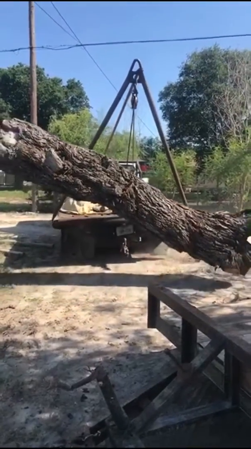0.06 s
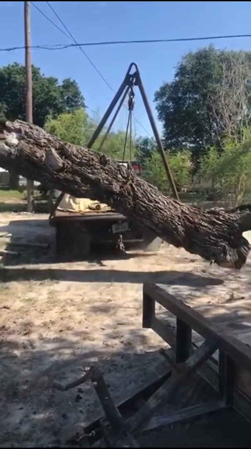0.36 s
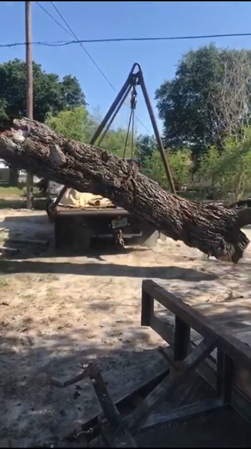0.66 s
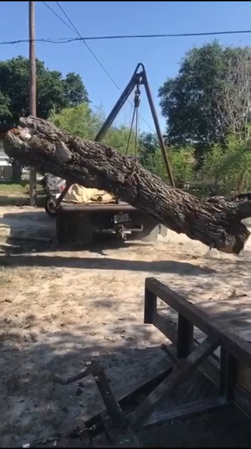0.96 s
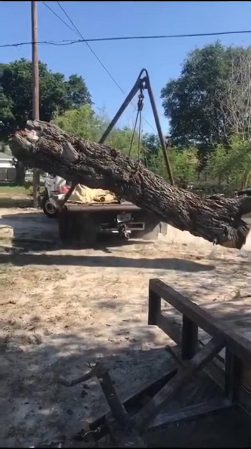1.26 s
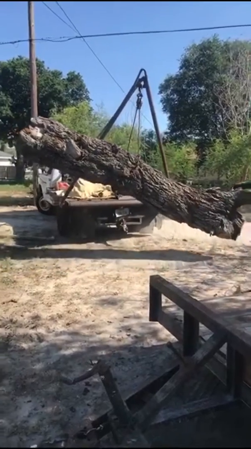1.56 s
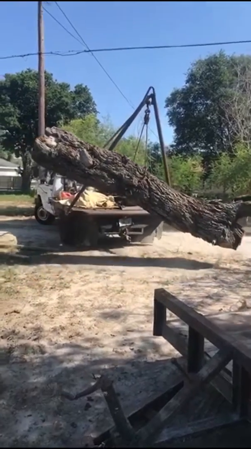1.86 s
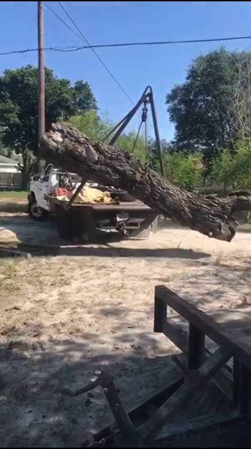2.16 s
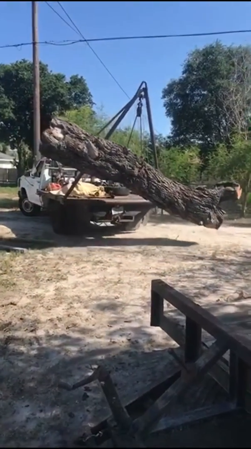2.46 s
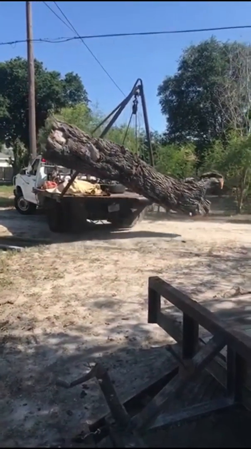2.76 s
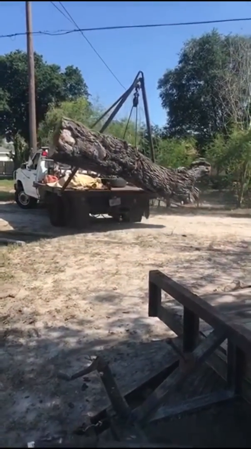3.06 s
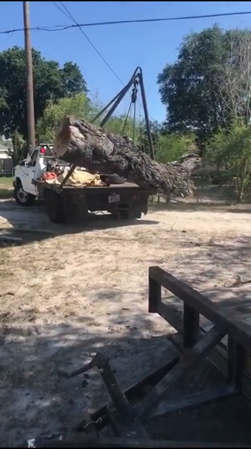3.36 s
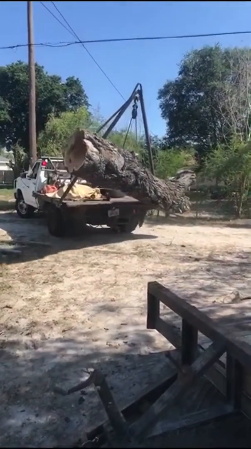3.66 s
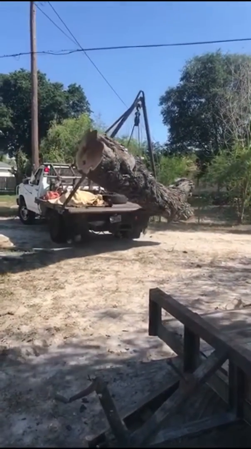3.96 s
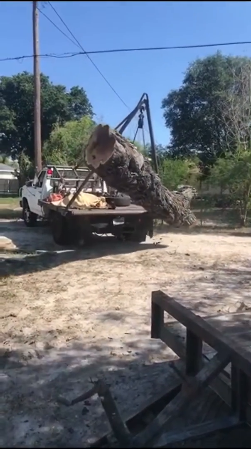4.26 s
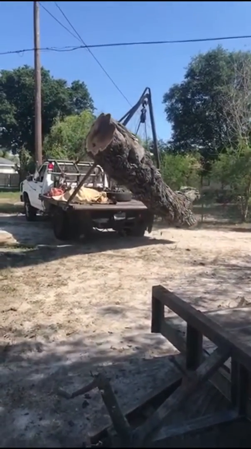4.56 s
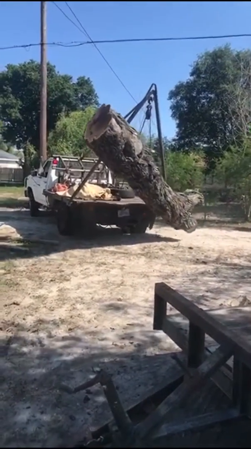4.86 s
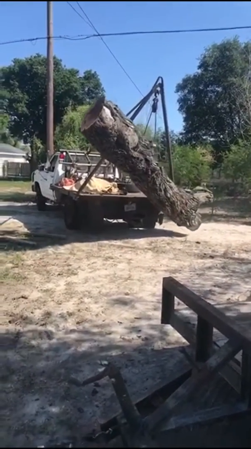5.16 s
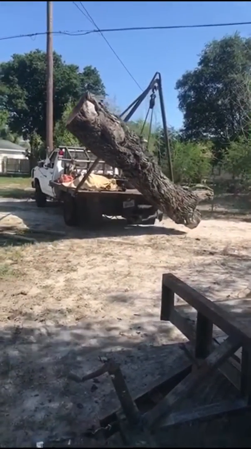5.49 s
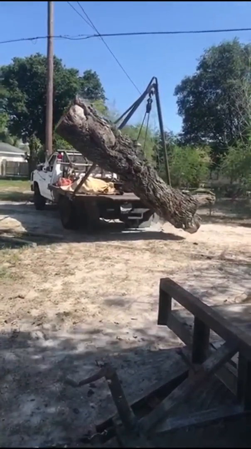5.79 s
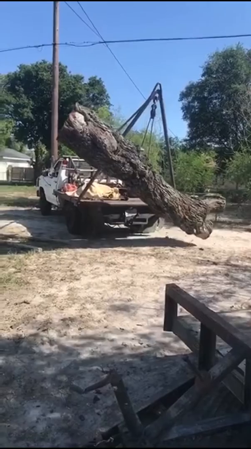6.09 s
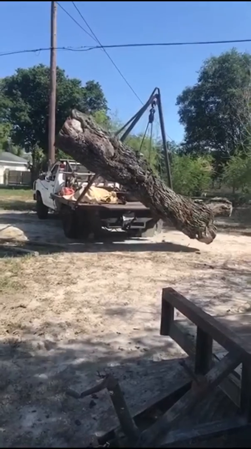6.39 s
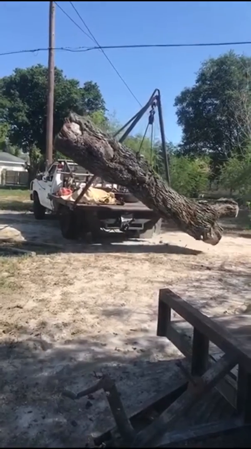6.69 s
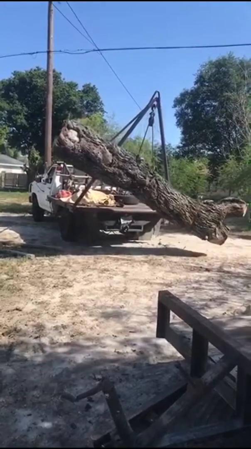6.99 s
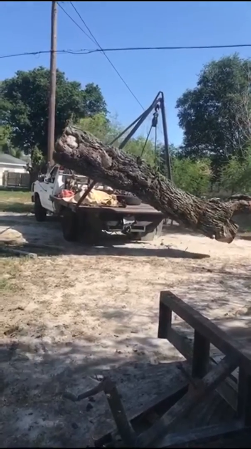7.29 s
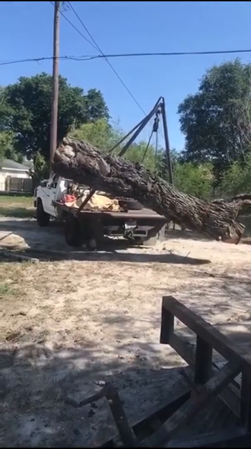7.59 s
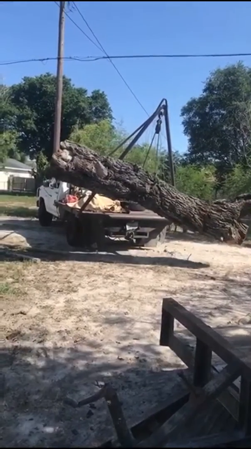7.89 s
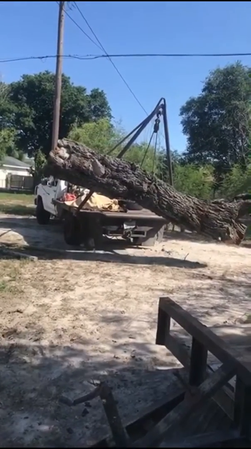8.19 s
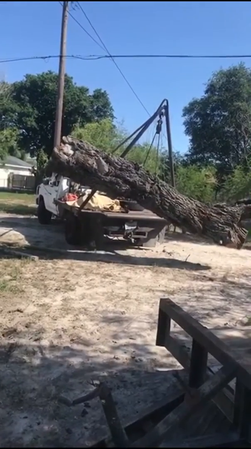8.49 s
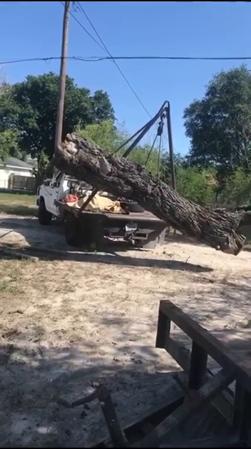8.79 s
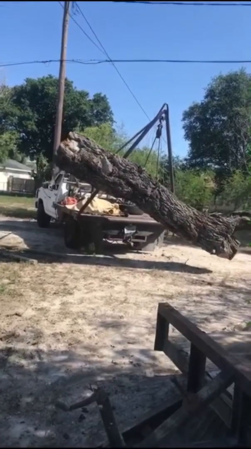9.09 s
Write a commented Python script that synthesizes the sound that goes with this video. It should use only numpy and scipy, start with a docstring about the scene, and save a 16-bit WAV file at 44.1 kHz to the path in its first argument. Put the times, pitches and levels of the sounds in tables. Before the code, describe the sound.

A truck engine rumbles at a crawl while steel scrapes, bangs and chains clink under a heavy log, with wind on the microphone.

```python
"""A dirt lot: a second engine idles close to the microphone as an old V8 flatbed truck crawls away,
a heavy log swinging from its hoist. First a turning steel part scrapes in strokes and squeals while
the V8 slows almost to a stall. At 3 s the rig bangs; the chain clinks and the load rubs on at a crawl,
among small dry ticks. Near 8 s the engine sags again and a faint rustle follows. Gusts buffet the
microphone throughout, hardest near the end."""
import sys
import numpy as np
from scipy import signal
from scipy.fft import rfft, irfft, next_fast_len
from scipy.io import wavfile
from scipy.ndimage import uniform_filter1d, map_coordinates

SR = 44100
rng = np.random.default_rng(int(sys.argv[2]) if len(sys.argv) > 2 else 0)


def master(y):
    """Save y as 16-bit WAV."""
    cut = np.clip(np.atleast_2d(y).T, -1, 1)
    pcm = np.round(cut * 32767)  # scale
    wavfile.write(sys.argv[1], SR, pcm.astype(np.int16))


N = 412026

# Echo of the lot: freq_hz, t60_s
YARD_DECAY = [(200, 1), (2000, 0.67), (6000, 1), (14000, 0.32)]
# The breeze freshens, lulls and returns: time_s, level_db
BREEZE = [(0, -20), (2.1, -19.5), (2.8, -20.5), (4, -34.5), (5, -33.5), (5.4, -28.5), (8.4, -22.5),
          (9.34, -32)]
# Hard buffets on the microphone: start_s, length_s, relative_db
WIND_BUFFETS = [(0.909, 0.11, -23), (1.06, 0.028, -19), (1.892, 0.016, -16), (2.069, 0.066, -17),
                (2.156, 0.14, -17), (2.723, 0.075, -23), (3.545, 0.202, -25), (5.17, 0.06, -34),
                (6.92, 0.15, -33), (7.656, 0.12, -27.5), (8.347, 0.098, -26), (8.887, 0.084, -21.5),
                (9.014, 0.053, -11), (9.061, 0.017, -8), (9.082, .008, -3.5), (9.107, 0.041, -15.5),
                (9.139, 0.025, -11), (9.197, 0.0098, -15.5)]
# Spectra of the breeze, a buffet and its ragged top: freq_hz, density_db
BREEZE_SPECTRUM = [(5, -85), (15, -34), (26, -6), (38, -0.5), (60, 0), (100, -7.5), (160, -23),
                   (300, -34.5), (700, -78)]
BUFFET_SPECTRUM = [(5, -70), (22, 2), (45, 3), (100, -2), (200, -9.5), (400, -21.5), (800, -41.5),
                   (2000, -86)]
FLUTTER_SPECTRUM = [(100, -21), (300, 2), (500, 3), (900, -3), (1400, -15.5), (2000, -25.5), (2800, -45),
                    (5000, -61)]
# The near engine's whirr, injectors and belt: freq_hz, density_db
WHIRR_SPECTRUM = [(240, -34), (400, -18), (520, -20), (650, 2.5), (800, -3), (1080, -1), (1350, -9),
                  (1700, -6), (2100, -16.5), (2400, -11), (3000, -18.5), (5500, -20), (7350, -17.5),
                  (9500, -21), (11500, -30.5), (15000, -53)]
INJECTOR_SPECTRUM = [(3000, -41), (6000, -19), (6700, 6), (7700, -5), (8500, 2), (9700, -10.5),
                     (10600, -32), (13000, -18), (15000, -44)]
BELT_SPECTRUM = [(1400, -55), (1620, -1), (1680, -0.5), (1750, -18), (2000, -55)]
# Its belt whine comes and goes: start_s, length_s, level_db
BELT_SWELLS = [(5.948, 0.41, -59.5), (7.05, .2, -57)]
# Close ticks: start_s, treble_db, body_re_treble_db
DRY_TICKS = [(4.128, -40, -14), (4.168, -37, -14), (4.475, -39, -20), (5.356, -35, -8), (5.463, -36, -12),
             (5.732, -34, -16), (5.83, -38, -20), (5.88, -38, -20), (5.947, -35, -16), (6.89, -39, -20),
             (7.905, -27, 9)]
# Their two bands: freq_hz, density_db
TICK_TREBLE = [(800, -30), (2500, -2), (5000, 0), (10000, -6), (15000, -13)]
TICK_BODY = [(200, 6.5), (1500, 2.0), (4000, -20), (9000, -40)]
# The rustle's hiss: freq_hz, density_db
RUSTLE_SPECTRUM = [(1500, -9), (3000, -1), (6500, -2.5), (10000, -19), (13000, -16), (15000, -30)]
# Its resonances: pitch_hz, width_hz, gain_db
RUSTLE_RESONANCES = [(2530, 39, 12), (3400, 93, 2), (4250, 70, 10), (5100, 62, 1), (6100, 54, -9),
                     (6740, 52, 7)]
# The swinging load leans on the steel: start_s, length_s, relative_db
LOAD_SWINGS = [(2.58, .08, -47.5), (3.08, .12, -44.5), (3.553, .06, -42), (3.775, 0.093, -48.5),
               (4.091, 0.12, -45), (4.234, .14, -40), (4.7, .06, -49.5), (5.449, 0.06, -40.5),
               (5.6, 0.31, -47.5), (6.703, 0.057, -45), (6.853, .04, -49)]
# A rub and its gritty edge: freq_hz, density_db
RUB_SPECTRUM = [(400, -15.5), (700, 1.5), (950, 2), (1500, 0.5), (2000, -1), (2600, 2.5), (3100, -0.5),
                (3700, -2.5), (5000, -6.5), (8000, -9.5), (14000, -32)]
EDGE_SPECTRUM = [(1200, -30), (2300, -2.5), (3000, 2.5), (3700, -4), (4800, -3), (6500, -13.5),
                 (10000, -28), (15000, -45)]
# Chain links snap taut: start_s, relative_db
CHAIN_SNAPS = [(2.183, -37), (2.211, -33), (3.344, -26.5), (3.352, -27), (3.361, -26.5), (3.859, -35.5),
               (3.921, -35), (4.683, -38), (5.108, -50), (5.208, -45), (5.79, -37), (5.85, -47),
               (6.871, -45), (6.921, -38.5), (7.658, -43), (7.677, -38), (7.69, -40.5)]
# A link's ring: pitch_hz, relative_db, t60_s
LINK_MODES = [(804, -3.5, 0.16), (1420, -12.5, 0.23), (2240, -13, 0.071), (2340, 8, 0.056),
              (2510, -2, 0.14), (5351, -27, 0.11), (5620, -11.5, 0.15), (6837, -36, .1), (9330, -21, 0.34),
              (9600, -17, 0.14), (12800, -25, 0.11)]
# A link's crack: freq_hz, density_db
CRACK_SPECTRUM = [(400, -12.5), (700, 4.5), (950, 0), (1500, 0), (2000, 0), (2600, 3.5), (3500, -6),
                  (5000, -7.5), (8000, -16.5), (14000, -41)]
# Blows on the steel bed: start_s, relative_db, t60_s
BED_BLOWS = [(2.862, -34, 0.048), (2.977, -28.5, 0.34), (2.997, -28, 0.23), (3.034, -10.5, 0.19),
             (3.047, -12, 0.13), (3.06, -16, 0.078), (3.078, -20, 0.16), (3.544, -26.5, 0.039),
             (3.655, -32, .25), (3.681, -35.5, 0.18), (3.857, -38.5, 0.14), (3.922, -45, 0.024),
             (4.683, -37, 0.041), (4.745, -39.5, 0.091), (7.67, -42, 0.088)]
# The bed's clatter and the frame's thud: freq_hz, density_db
CLATTER_SPECTRUM = [(40, -42), (130, 4), (320, -2.5), (470, -26), (610, -6), (800, -6.5), (960, -6),
                    (1300, -9.5), (2200, -11), (2900, -15.5), (4500, -25), (8400, -38.5), (14000, -60)]
THUD_SPECTRUM = [(60, -30), (130, -3), (190, 0.5), (310, -3), (450, -17), (900, -63)]
# Ring of the bed, and of the steel scraped hard or grazed: pitch_hz, width_hz, gain_db
BED_RESONANCES = [(310, 30, 2), (829, 42, 7), (958, 30, 7), (1610, 110, 2), (1900, 150, 2), (2570, 50, 4),
                  (2740, 40, 3), (3100, 150, 2)]
HARD_RESONANCES = [(786, 11, -28), (969, 30.6, 15), (1450, 32, 10), (1540, 24, 0), (1743, 12.5, 17),
                   (2365, 28, 8.5), (2705, 22.5, 10), (3043, 48, 6), (3380, 61, 0), (4376, 107, 4),
                   (6530, 160, 0.5), (8650, 210, 0), (9700, 67, -12), (11020, 150, 0)]
GRAZED_RESONANCES = [(659, 18.5, 11), (901, 43, 12.5), (1043, 33, 10.5), (1343, 38, 7), (1780, 52, 8),
                     (2270, 120, 4.5), (2750, 24, 6), (2910, 19, 1.5), (3036, 8.3, 4), (4300, 84, -8)]
# The steel catches: start_s, length_s, pitch_hz, glide_hz_per_s, relative_db
STEEL_SQUEALS = [(.527, .028, 1485, -700, -25), (1.035, .025, 1445, -300, -33), (1.5, .04, 1465, -800, -28)]
# A squeal's partials: pitch_multiple, relative_db
SQUEAL_HARMONICS = [(1, 2.5), (2, -2), (3, -2), (6, -15)]
# Strokes of the turning part: start_s, length_s, level_db
SCRAPE_STROKES = [(0.018, 0.077, -24.5), (0.194, 0.063, -24), (0.35, 0.059, -23), (0.479, 0.093, -26),
                  (0.688, 0.046, -25.5), (0.827, 0.088, -24.5), (.992, 0.069, -24), (1.162, 0.056, -23.5),
                  (1.298, 0.094, -24.5), (1.429, 0.09, -27), (1.536, 0.2, -27.5), (1.806, 0.097, -25.5),
                  (1.938, .12, -27), (2.202, 0.03, -31), (2.354, 0.075, -27), (2.496, 0.092, -26)]
# Their friction: freq_hz, density_db
SCRAPE_SPECTRUM = [(300, -5), (520, -15.5), (750, -4), (1200, -5.5), (1650, -2.5), (2000, -8.5), (2600, -4),
                   (4600, -8), (6600, -13.5), (7600, -18), (11400, -20), (15300, -31.5)]
# The V8 slows, almost stalls, recovers to a crawl and sags once more: time_s, firing_hz
V8_SPEED = [(0, 105), (.6, 96), (1.2, 92.5), (1.8, 76), (2.3, 50), (2.55, 43), (3.2, 57), (3.75, 59.4),
            (5.6, 56.7), (6.2, 58.6), (7.65, 54.5), (8.35, 38), (8.8, 58)]
# Side tones of unequal cylinders, and firing harmonics: firing_multiple, relative_db
LOPE_TONES = [(.625, -11), (.75, -14), (.875, -16), (1.125, -19), (1.25, -22), (1.375, -10), (1.5, -18),
              (1.625, -15), (1.75, -25), (1.875, -25), (2, -16), (2.125, -19), (2.375, -22), (2.625, -24),
              (3, -16)]
# The tailpipe booms near one pitch; tones swell as they pass through it: freq_hz, level_db
PIPE_BOOM = [(25, -31), (40, -29), (58, -23), (84, -15), (106, -20), (130, -21), (180, -24), (300, -37)]
# The tailpipe's colouring of the gas puffs: freq_hz, gain_db
PIPE_RESPONSE = [(10, -79), (60, -12), (110, 1), (175, -0.5), (210, -3.5), (250, -3), (315, -6),
                 (370, -18.5), (480, -25.5), (800, -34.5), (2000, -79)]
# The puffs are strong pulling away, weak at a crawl: time_s, level_db
BURBLE_LEVEL = [(0, -29), (2.4, -25.5), (2.9, -35.5), (7.7, -34), (8.1, -38.5), (9.34, -36.5)]


def amp(db):
    """Decibels to gain."""
    return np.exp(np.asarray(db) * (np.log(10) / 20))


def unit(x):
    """Scale to rms 1."""
    return x / np.sqrt(np.mean(x ** 2) + 1e-20)


def clock():
    """Every sample's time in seconds."""
    return np.arange(N) / SR


def along(points, hz):
    """Read (freq_hz, value) points on a log frequency axis."""
    freqs, values = np.transpose(points)
    return np.interp(np.log(hz + 1), np.log(freqs + 1), values)


def curve(points):
    """Read (time_s, value) points at every sample."""
    return np.interp(clock(), *np.transpose(points))


def wobble(rate):
    """A smooth random curve, rate knots a second."""
    fine = signal.resample_poly(rng.standard_normal(int(N * rate / SR) + 4), 8, 1)
    return np.interp(np.linspace(0, len(fine) - 16, N), np.arange(len(fine)), fine)


def filtered(x, response):
    """Filter x by a gain given as a function of frequency."""
    size = next_fast_len(N + SR // 2)
    return irfft(rfft(x, size) * response(np.fft.rfftfreq(size, 1 / SR)), size)[:N]


def hiss(spectrum, rough_db=0):
    """Coloured noise of rms 1; roughness clumps it into grains."""
    grains = rng.standard_normal(N) * amp(rough_db * wobble(900))
    return unit(filtered(grains, lambda hz: amp(along(spectrum, hz))))


def resonate(x, modes):
    """Add ringing modes to x at unchanged power."""
    def body(f):
        return 1 + sum(amp(db) * 1j * f * width / (hz * hz - f * f + 1j * f * width)
                       for hz, width, db in modes)
    return unit(filtered(x, body)) * np.std(x)


def swell(start_s, length_s, attack_s, t60_s):
    """An envelope that rises, holds and dies away."""
    start = round(start_s * SR)
    t = np.arange(min(N - start, int((length_s + 2 * t60_s) * SR))) / SR
    decay = amp(-60 * np.maximum(t - length_s, 0) / t60_s)
    shape = np.zeros(N)
    shape[start:start + len(t)] = (1 - np.exp(-t / attack_s)) * decay
    return shape


def shifting(x, depth_db, frames):
    """Each band of x swells and fades at random, over a span of 12 ms frames."""
    bands = signal.stft(x, nperseg=1024)[2]
    drift = uniform_filter1d(rng.standard_normal(bands.shape), frames, axis=1)
    drift = uniform_filter1d(drift, frames // 2, axis=1)
    drift = unit(uniform_filter1d(drift, 3, axis=0))
    return signal.istft(bands * unit(amp(depth_db * drift)), nperseg=1024)[1][:N]


def yard_echo(x):
    """Trees and houses round the lot return a faint tail whose top treble dies first."""
    hz, t, bands = signal.stft(rng.standard_normal(SR), SR, nperseg=256)
    decay = amp(-60 * t / along(YARD_DECAY, hz)[:, None])
    tail = signal.istft(bands * decay, SR, nperseg=256)[1]
    return signal.fftconvolve(x, np.pad(tail, (600, 0)) / np.linalg.norm(tail))[:N]


def wind():
    """Low turbulence right on the microphone; the harder a buffet, the more ragged its top."""
    flurry_db = 1.5 * wobble(13) + 1.5 * wobble(3)
    rumble = amp(curve(BREEZE) + flurry_db) * hiss(BREEZE_SPECTRUM)
    gusts = sum(amp(db) * swell(s, length, 0.0048, t60_s=0.078) for s, length, db in WIND_BUFFETS)
    ragged = amp(-11 + 3.4 * wobble(110)) * gusts ** 1.74 * hiss(FLUTTER_SPECTRUM, rough_db=3.7)
    return rumble + amp(1.56) * gusts * hiss(BUFFET_SPECTRUM) + ragged


def idling_engine(firing_hz=28.25):
    """A four-cylinder engine close by: a whirr, a belt whine and three injector clicks a firing."""
    firings = np.cumsum(firing_hz * (1 + 0.0065 * wobble(2.5))) / SR
    clicks = sum(amp(db) * np.exp(-((firings - lag) % 1) / .06)
                 for lag, db in [(0, -1), (.19, -2), (.39, 0)])
    whirr = amp(-52.5 + .9 * wobble(7)) * shifting(hiss(WHIRR_SPECTRUM), depth_db=3, frames=50)
    belt = sum(amp(db) * swell(s, length, 0.086, t60_s=1) for s, length, db in BELT_SWELLS)
    whine = belt * hiss(BELT_SPECTRUM)
    uneven = amp(2.4 * wobble(60))
    injectors = shifting(unit(clicks * uneven * hiss(INJECTOR_SPECTRUM)), depth_db=5.5, frames=60)
    return whirr + whine + amp(-60.5) * injectors


def ticks():
    """Short dry ticks near the microphone, most of them thin and bright."""
    snaps = [(amp(db) * swell(s, 0, .0001, t60_s=0.0076), body_db) for s, db, body_db in DRY_TICKS]
    treble = sum(snap for snap, _ in snaps) * hiss(TICK_TREBLE)
    body = sum(snap * amp(body_db) for snap, body_db in snaps) * hiss(TICK_BODY)
    return treble + body


def rustle(peak_s=8.66, fade_db_per_s=80):
    """A faint, bright, grainy rustle that swells and fades."""
    level = amp(-49.5 - fade_db_per_s * np.abs(clock() - peak_s))
    grains = level * hiss(RUSTLE_SPECTRUM, rough_db=4.7)
    return shifting(resonate(grains, RUSTLE_RESONANCES), depth_db=2, frames=8)


def load_pressure(db_per_octave=7, fade_db_per_s=2.5):
    """A steady rub that grows with speed and fades with distance, plus a push for each swing."""
    hz = curve(V8_SPEED)
    rolling = amp(-44 + db_per_octave * np.log2(hz / np.median(hz)) - fade_db_per_s * clock())
    swings = sum((amp(db) * swell(s, length, 0.012, t60_s=0.78)) ** 2 for s, length, db in LOAD_SWINGS)
    return np.sqrt(rolling ** 2 + swings)


def load_rubbing():
    """The load grazes the steel at a wandering contact point; the hardest rubs get a gritty edge."""
    push = load_pressure()
    judder = amp(1.5 * wobble(45))
    friction = push * judder * hiss(RUB_SPECTRUM, rough_db=2.5)
    bite = push.max() * (push / push.max()) ** 1.45  # grows faster than the pressure
    edge = amp(-5.5) * bite * judder * hiss(EDGE_SPECTRUM, rough_db=4.6)
    return shifting(amp(-0.5) * resonate(friction, GRAZED_RESONANCES) + edge, depth_db=3, frames=24)


def chain():
    """Links snap taut, crack and ring, differently each time; hard snaps crack the most."""
    rings, t = np.zeros(N + SR), np.arange(SR // 3) / SR
    for s, db in CHAIN_SNAPS:
        for hz, mode_db, t60 in LINK_MODES:
            decay = amp(mode_db + rng.normal(0, 3.2) - 60 * t / t60)
            tone = np.sin(2 * np.pi * hz * (1 + rng.normal(0, .007)) * t)
            rings[round(s * SR):][:len(t)] += amp(db - 4.5) * decay * tone
    hardest_db = max(db for _, db in CHAIN_SNAPS)
    crack = sum(amp(db - 1.5 + 0.57 * (db - hardest_db)) * swell(s, 0, 0.00072, t60_s=0.11)
                for s, db in CHAIN_SNAPS)
    return rings[:N] + crack * hiss(CRACK_SPECTRUM, rough_db=1.6)


def bed_bangs():
    """The load jolts the hoist: the steel bed clatters and the frame thuds."""
    force = np.sqrt(sum((amp(db) * swell(s, 0, 0.00096, t60)) ** 2 for s, db, t60 in BED_BLOWS))
    shake = np.sqrt(sum((amp(db) * swell(s, 0, 0.0061, t60_s=.25)) ** 2 for s, db, _ in BED_BLOWS))
    clatter = resonate(amp(1.5) * force * hiss(CLATTER_SPECTRUM, rough_db=2.2), BED_RESONANCES)
    return clatter + amp(-5) * shake * hiss(THUD_SPECTRUM)


def steel_squeal():
    """The sliding steel locks into one mode for a moment and its pitch sags."""
    out, t = np.zeros(N), np.arange(SR // 8) / SR
    for s, length, hz, glide, db in STEEL_SQUEALS:
        phase = 2 * np.pi * (hz * t + glide * t ** 2 / 2)
        voice = sum(amp(level) * np.sin(k * phase) for k, level in SQUEAL_HARMONICS)
        span = slice(round(s * SR), round(s * SR) + len(t))
        out[span] += amp(db) * swell(s, length, .004, t60_s=.05)[span] * voice
    return out


def steel_scrape(graze_from_s=2.3, flex_s=0.00024):
    """Steel rubs once a turn and rings the part, biting hard at first, then only grazing."""
    pressure = sum(amp(db) * swell(s, length, .0006, t60_s=0.12) for s, length, db in SCRAPE_STROKES)
    friction = pressure * amp(0.24 * wobble(70)) * hiss(SCRAPE_SPECTRUM, rough_db=0.97)
    hard = clock() < graze_from_s
    ringing = resonate(friction * hard, HARD_RESONANCES) + resonate(friction * ~hard, GRAZED_RESONANCES)
    flexed_time = clock() + flex_s * wobble(13)  # the part flexes, so its ring wavers
    wavering = map_coordinates(ringing, [flexed_time * SR], order=3)
    return shifting(wavering, depth_db=3.6, frames=8)  # the contact point wanders


def v8_exhaust():
    """Eight unequal cylinders through a tailpipe: a firing tone, loping side tones and puffs of gas."""
    hz = curve(V8_SPEED)
    firings = np.cumsum(hz * (1 + .008 * wobble(14))) / SR
    tones = amp(along(PIPE_BOOM, hz) - 1.5 + 1.4 * wobble(12)) * np.sin(2 * np.pi * firings)
    for multiple, db in LOPE_TONES:
        level = amp(along(PIPE_BOOM, multiple * hz) + db + 1.44 * wobble(5))
        tones += level * np.sin(2 * np.pi * (multiple * firings + rng.random()))
    cylinder_gain = amp([2, -1, 0, -2, 2, 1, -2, 0])
    puffs = cylinder_gain[firings.astype(int) % 8] * np.exp(-2 * (firings % 1))
    gas = puffs * (1 + 5 * rng.standard_normal(N))
    burble = unit(filtered(gas, lambda f: amp(along(PIPE_RESPONSE, f))))
    return np.sqrt(2) * tones + amp(curve(BURBLE_LEVEL)) * burble


def scene():
    """The truck and its load out on the lot, with the close sounds on top, in mono."""
    steel = steel_scrape() + steel_squeal() + bed_bangs() + chain()
    truck = steel + amp(-14) * yard_echo(steel) + v8_exhaust() + load_rubbing()
    return (truck + rustle() + ticks() + idling_engine() + wind())[None]


def record(dry):
    """The microphone rounds off the largest swings and keeps nothing above its band limit."""
    ceiling, top_hz = .95, 15450
    soft = dry[0] / (1 + np.abs(dry[0] / ceiling) ** 8) ** (1 / 8)
    return filtered(soft, lambda hz: hz < top_hz)[None]


dry = scene()
out = record(dry)
master(out)
```